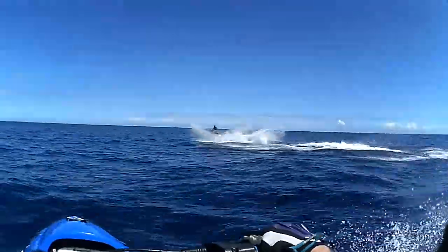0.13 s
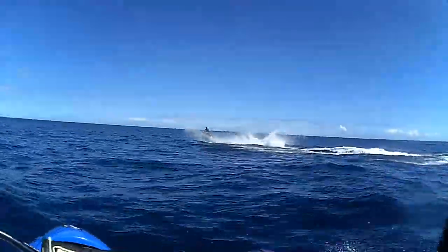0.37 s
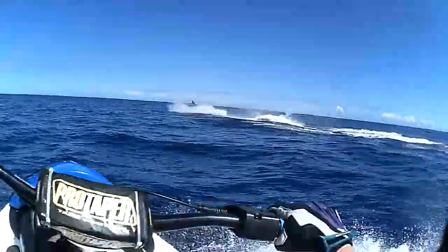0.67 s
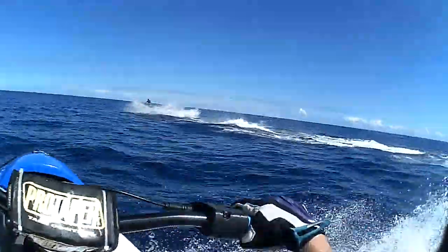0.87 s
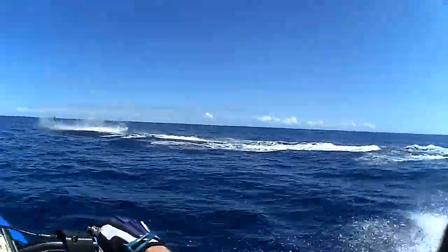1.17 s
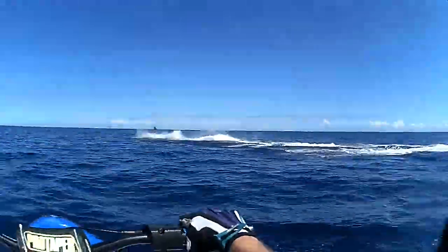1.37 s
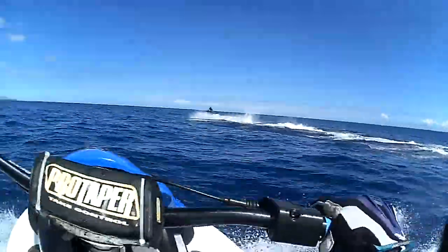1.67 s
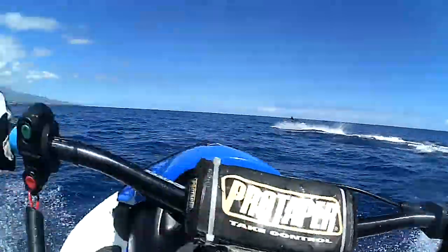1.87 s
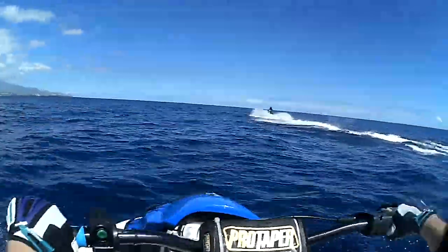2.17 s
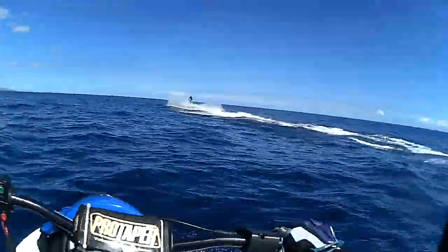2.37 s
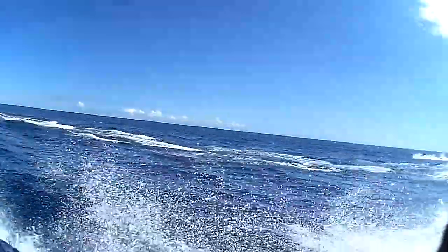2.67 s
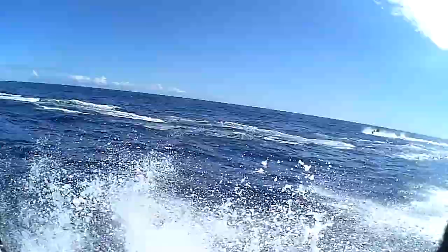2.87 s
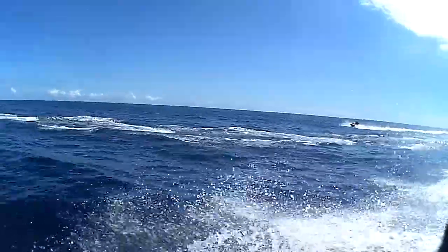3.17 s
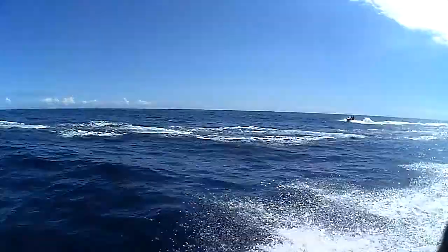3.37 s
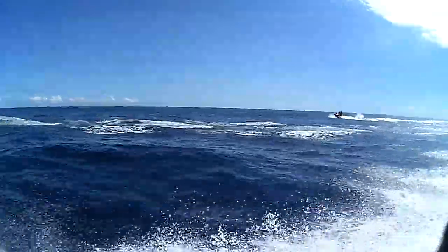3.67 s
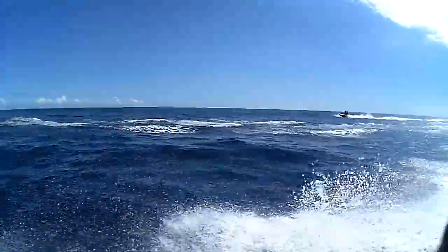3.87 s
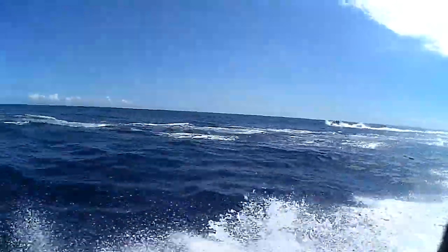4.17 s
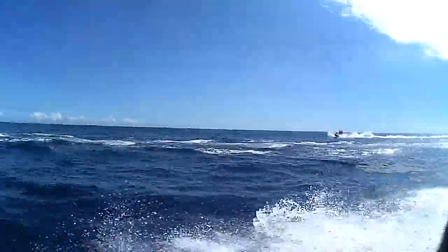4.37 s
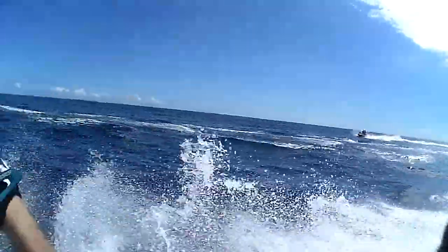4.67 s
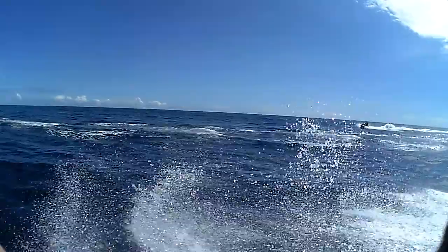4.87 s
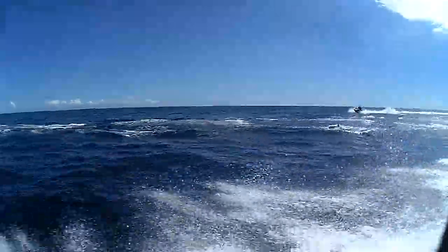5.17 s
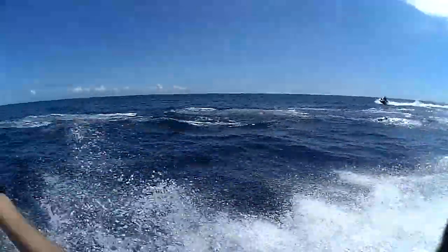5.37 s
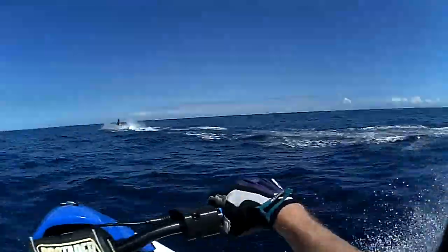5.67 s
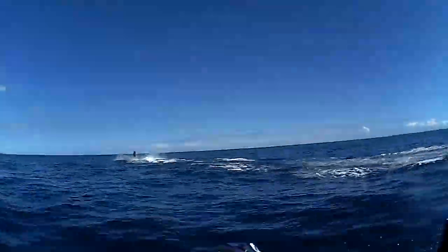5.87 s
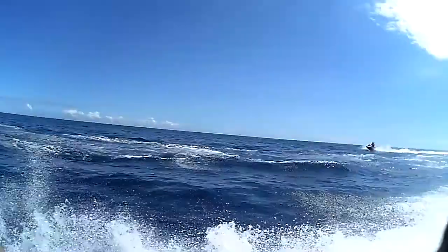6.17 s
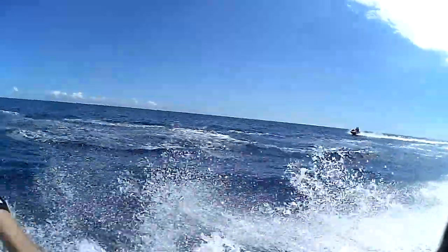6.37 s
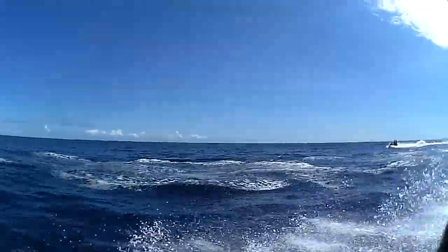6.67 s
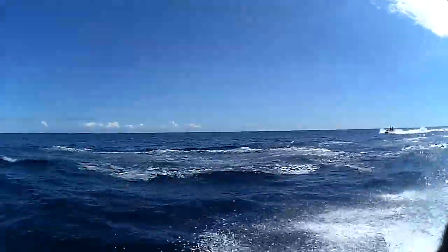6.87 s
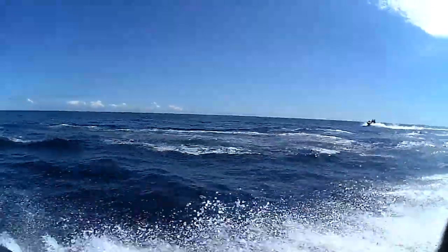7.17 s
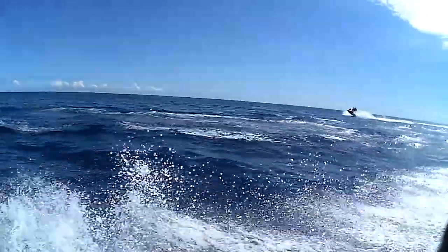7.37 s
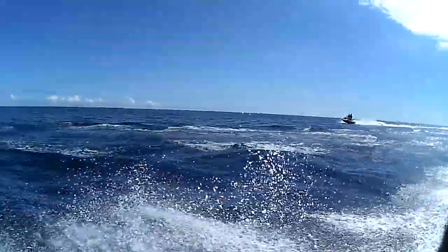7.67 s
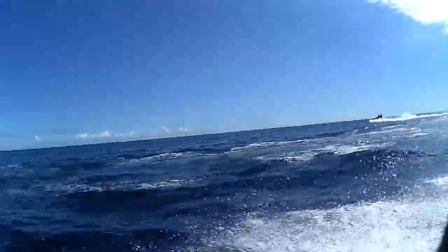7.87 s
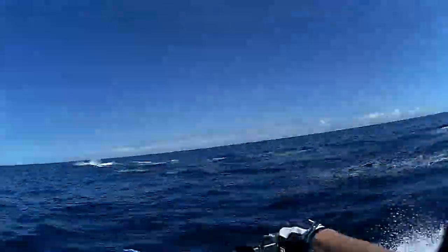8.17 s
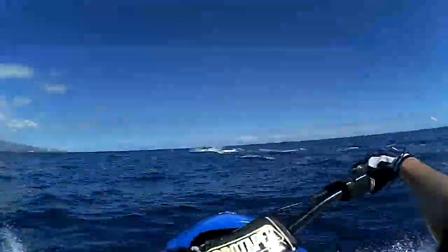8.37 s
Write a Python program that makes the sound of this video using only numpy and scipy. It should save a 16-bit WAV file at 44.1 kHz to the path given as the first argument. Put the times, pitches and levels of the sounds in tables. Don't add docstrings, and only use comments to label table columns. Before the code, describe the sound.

Aboard a jet ski on open sea, heard through a small sealed microphone housing. From 0 to 2.5 seconds a smooth, low two-cylinder engine hum wavers slightly, while strong gusts flutter, rush and whistle hollowly. Dull jolts from waves thump the housing, thickest around 2 seconds, and scattered drops tick on plastic. At about 2.5 the engine jumps higher and becomes quieter and a little rougher; wind and knocks ease, leaving soft spray hiss. Around 4.2 its pitch sags sharply, then climbs back by 4.6. From 5.6 to 6 gusts, slaps and a cluster of drops return as revs settle lower. Deep sea rumble swells near 6.7, then fades; the engine rises again around 7.5. A last gust and jolts arrive after 8.2, with rumble growing to the end at 8.5. Thin microphone hiss persists.

```python
import sys
import numpy as np
from scipy import signal
from scipy.fft import rfft, irfft
from scipy.io import wavfile
from scipy.ndimage import uniform_filter1d

SR = 44100
rng = np.random.default_rng(int(sys.argv[2]) if len(sys.argv) > 2 else 0)


def unload_audio(sound):
    columns = np.transpose(np.atleast_2d(sound))
    steps = np.round(np.clip(columns, -1, 1) * 32767)
    wavfile.write(sys.argv[1], SR, steps.astype(np.int16))


def gain_from_decibels(decibels):
    exponent = np.asarray(decibels, float) / 20
    return 10 ** exponent


N = 375983

# time_s, firing_rate_hz, tone_level_db, cylinder_mismatch_db, second_overtone_db
ENGINE_COURSE = [(0, 129.9, -40.5, -24, -28), (.42, 138, -40.5, -23, -24), (.95, 144.5, -39, -26, -30.5),
                 (1.55, 137.9, -39.3, -25, -26), (2.42, 140.8, -39.5, -20, -28),
                 (2.62, 163.5, -45, -16, -25.5), (3.03, 169.3, -48, -12, -26),
                 (3.7, 162.3, -46.5, -17, -23.5), (3.8, 153.2, -41.5, -21, -26.5),
                 (4.16, 88.4, -44, -29, -24), (4.6, 153.5, -39.5, -27, -26.5),
                 (4.85, 160.7, -41.5, -23, -30), (5.0, 154.5, -44.5, -25, -23),
                 (5.49, 153.5, -41.5, -25.5, -28), (5.72, 136.2, -38.5, -28, -23),
                 (7.17, 133.3, -41, -27.5, -25), (7.58, 159.6, -46.5, -18.5, -24.5),
                 (8.53, 157, -40.5, -18, -22)]
# middle_s, length_s, tone_change_db, speed_change_hz
ENGINE_WAVES = [(.24, .26, -3.5, -2), (.65, .2, -1, -1.5), (1.31, 0.24, -2.5, 1.5), (1.58, 0.078, 0, -3),
                (2.04, 0.068, -2, -1), (2.215, 0.18, -9, -6), (2.37, .06, -4, -1), (2.8, 0.074, -1.5, -1.5),
                (3.22, 0.19, 1, -1.5), (3.42, .16, -1.5, -2.5), (3.99, .16, -3, -3),
                (4.34, .28, -3.5, -1.5), (5.08, 0.11, -3.5, -1), (5.39, 0.25, -3.5, 0),
                (5.62, 0.11, 1.5, -2), (6.05, 0.77, -3.5, -0.2), (6.5, .15, -0.8, 1.5),
                (6.72, 0.23, -4, -0.66), (7.0, 0.21, -2, 0), (7.31, 0.17, 3, -0.7), (7.45, .15, 2, -1),
                (7.85, 0.078, -6.5, -1.5), (8.08, 0.16, 3, 2), (8.28, .16, -1, 1.5)]

# time_s, rumble_level_db
SEA_CHOP = [(0, -54), (.5, -49), (.88, -48.5), (1.26, -51), (1.8, -46.5), (2.3, -51), (2.7, -57),
            (4.3, -61), (4.9, -58), (5.15, -52), (5.45, -62), (5.9, -48), (6.1, -65.5), (6.7, -43),
            (7.2, -66.5), (7.9, -59.5), (8.1, -54), (8.53, -45)]
# middle_s, length_s, buffet_db, whistle_db
WIND_GUSTS = [(0, .05, 6, 13), (.13, 0.073, 8.5, 5.5), (.22, 0.073, -0.5, 7), (.33, 0.042, 10, 11.5),
              (.71, 0.22, 10.5, 3), (.875, .14, 5.5, 11.5), (1.0, .04, 10, 9), (1.31, .03, 1.5, 9),
              (1.42, 0.13, 4.5, 9.5), (1.55, 0.12, 10.5, 9), (1.69, 0.14, 10, 5), (2.03, 0.17, 10, -4),
              (2.21, 0.15, 14, 1), (2.38, 0.17, 9.5, 4), (2.475, 0.076, 2, 6), (3.25, 0.055, 4, 1.5),
              (4.27, 0.082, -5, 3), (4.65, .06, 6, -3), (5.0, 0.14, 3.5, -1), (5.53, .07, 7, 9),
              (5.69, 0.18, 9, 8), (5.83, 0.18, 10.5, 11.5), (5.95, 0.1, 0, 2.5), (6.17, .06, -1, 4),
              (6.78, 0.064, 2, 0), (8.225, 0.16, 10, 10.5), (8.32, .05, 9, 0), (8.52, .12, 5, 3)]
# pitch_hz, level_db (per Hz)
RUMBLE_COLOUR = [(3, -14), (8, -16.5), (18, 6.5), (35, -0.5), (60, -9), (100, -33)]
# pitch_hz, level_db (per Hz)
FLUTTER_COLOUR = [(25, -26), (50, 3.5), (110, 8.5), (215, 1.5), (300, -7), (450, -27)]
# pitch_hz, level_db (per Hz)
RUSH_COLOUR = [(180, -4.5), (300, 3.5), (500, 1.5), (750, -7.5), (1100, -22.5), (1600, -17)]
# pitch_hz, width_hz, level_db
AIR_POCKET = [
    (1877, 400, 1.5),
    (1430, 470, -1.3),
    (2360, 760, -8),
]

# peak_time_s, peak_level_db, rise_ms, recovery_ms
PUSH_JOLTS = [(.755, -40, 8.3, 4), (1.008, -40, 4, 3.3), (1.670, -41.5, 5, 2.8), (1.719, -36, 3.2, 2),
              (2.011, -38, 2.44, 3.5), (2.535, -43, 13, 18.6), (5.090, -40, 9.6, 11.5),
              (5.722, -34, 4.3, 6), (5.864, -38, 3.1, 10.2), (5.927, -33, 6.4, 6.8), (8.413, -34, 7.2, 8),
              (8.487, -31.5, 3.7, 4)]
# peak_time_s, peak_level_db, fall_ms, recovery_ms
SLAP_JOLTS = [(.123, -32, 6.8, 11), (.218, -36.5, 8.3, 8.8), (.323, -27, 8.1, 8.3), (1.018, -39, 3.5, 3.95),
              (1.406, -31.5, 1.6, 3.1), (1.416, -27, 2.2, 5.5), (1.576, -40, 1.85, 2.1),
              (1.676, -36, 2.7, 5), (1.909, -35, 3.2, 2.3), (1.944, -35, 5, 6.6), (1.986, -33, 5.2, 3.4),
              (2.063, -35, 2.5, 1.4), (2.074, -30.5, 2.4, 1.8), (2.168, -35, 3.7, 2.5),
              (2.180, -32, 3.2, 3.1), (2.218, -36, 1.33, 9), (2.266, -38, 4.4, 7.2), (2.311, -30, 5.1, 6.1),
              (2.333, -33, 4.8, 1.9), (2.412, -37, 9.2, 7), (5.639, -39, 2.8, 1.6), (5.832, -43, 1.76, 2.1),
              (6.118, -39, 41, 31), (6.630, -37, 6.5, 7), (6.711, -35.5, 1.8, 13.2), (6.832, -35, 6.4, 9.2),
              (7.890, -39, 5.8, 8), (8.261, -39, 5.5, 6), (8.320, -34, 5.6, 4.7)]
# start_s, peak_level_db
WATER_DROPS = [(.3287, -43), (.4135, -41), (.577, -53), (.8225, -44), (.8684, -54), (1.0026, -51),
               (1.1403, -40), (1.4132, -34), (1.5743, -37), (1.641, -39), (2.4835, -40), (5.6384, -36),
               (5.7059, -51), (5.7294, -52), (5.7566, -50), (5.7993, -48), (5.8252, -33)]

# middle_s, length_s, coarse_mist_db, fine_mist_db
SPRAY_SHEETS = [(.33, 0.54, 4.5, 5), (1.38, 0.67, 4, 4), (2.2, 0.37, 3.5, 2.5), (2.9, 0.98, 3.5, 3),
                (3.75, .45, 3.5, 2.5), (4.25, 0.6, 4.5, 2.5), (5.02, 0.41, 5.5, 4), (6.02, .5, 5.5, 4.5),
                (6.72, .35, 5, 4), (7.13, 0.27, 5, 2), (7.53, .4, 6, 2), (7.85, .3, 3, 2.5),
                (8.4, .4, 3.5, 3.5)]
# pitch_hz, level_db (per Hz)
COARSE_COLOUR = [(4500, -10), (6000, -4), (6900, -1), (7600, -2.5), (8450, -0.5), (9100, -4.5),
                 (9800, -11.5)]
# pitch_hz, level_db (per Hz)
FINE_COLOUR = [(8800, -9), (9500, -4), (10500, -2), (11200, -3.5), (12500, -15)]
# pitch_hz, level_db (per Hz)
HISS_COLOUR = [(20, 1), (100, 1), (230, 6.5), (750, 6.5), (1200, 5.5), (1800, 3.5), (2400, 2.5), (4200, 0),
               (11000, -6.5), (12500, -1.5), (14600, -3), (15200, -2), (15740, -19)]


def curves(table):
    time_s, *columns = np.transpose(table)
    return [np.interp(np.arange(N) / SR, time_s, column) for column in columns]


def swells(table, edge=2.5):
    middle_s, length_s, *columns = np.transpose(table)[:, :, None]
    coarse_steps = np.arange(0, N, 32)
    distance = np.abs(2 * (coarse_steps / SR - middle_s) / length_s)
    hump = np.exp(-distance ** edge)
    return [np.interp(np.arange(N), coarse_steps, (column * hump).sum(0)) for column in columns]


def unit(x):
    return x / np.sqrt(np.mean(x ** 2))


def coloured(x, colour):
    pitch_hz, level_db = np.transpose(colour)
    log_hz = np.log(np.arange(N // 2 + 1) * SR / N + 1e-3)
    gain_db = np.interp(log_hz, np.log(pitch_hz), level_db, left=-90, right=-90)
    return unit(irfft(rfft(x) * gain_from_decibels(gain_db), N))


def walk(rate_hz):
    hold = int(SR / rate_hz)
    held = np.repeat(rng.standard_normal(N // hold + 1), hold)
    smooth = uniform_filter1d(uniform_filter1d(held, hold), hold)
    return unit(smooth[:N])


def engine():
    inertia = int(0.07 * SR)
    course = [uniform_filter1d(column, inertia) for column in curves(ENGINE_COURSE)]
    firing_hz, tone_db, uneven_db, second_db = course
    change_db, change_hz = swells(ENGINE_WAVES, edge=2.1)
    firing_hz = firing_hz + change_hz
    tone_db = tone_db + change_db
    uneven_db = uneven_db - 0.7 * change_db
    second_db = second_db - 0.69 * change_db

    turn = np.pi * np.cumsum(firing_hz * (1 + 0.0027 * walk(26))) / SR
    firing = gain_from_decibels(0.72 * walk(11)) * np.sin(2 * turn)
    half = gain_from_decibels(uneven_db + 1.85 * walk(15)) * np.sin(turn + 0.53 * walk(12))
    between = gain_from_decibels(-35.0 + 1.0 * walk(11)) * np.sin(3 * turn + 0.5 * walk(8.4))
    second = gain_from_decibels(second_db + 1.5 * walk(22)) * np.sin(4 * turn + 0.29 * walk(12))
    third = gain_from_decibels(-42.5 + 2.6 * walk(14)) * np.sin(6 * turn + 0.5 * walk(12))
    return np.sqrt(2) * gain_from_decibels(tone_db) * (firing + half + between + second + third)


def wind():
    rumble_db, = curves(SEA_CHOP)
    buffet_db, whistle_db = swells(WIND_GUSTS)
    calm_db = 0.13 * (rumble_db - np.mean(rumble_db))
    flutter_db = -60 + calm_db + buffet_db + 1.9 * walk(14)
    rush_db = -71 + calm_db + 0.35 * buffet_db + 0.65 * whistle_db + 0.9 * walk(15)
    ring_db = -74.5 + calm_db + whistle_db + 1.24 * walk(16)

    rumble = gain_from_decibels(rumble_db + 3.0) * coloured(eddies(rate_hz=12, patchy_db=2.0), RUMBLE_COLOUR)
    gusts = eddies(rate_hz=50, patchy_db=0.5)
    flutter = gain_from_decibels(flutter_db) * coloured(gusts, FLUTTER_COLOUR)
    rush = gain_from_decibels(rush_db) * coloured(gusts, RUSH_COLOUR)
    fine = pocket(eddies(rate_hz=170, patchy_db=0.5))
    ring = gain_from_decibels(ring_db) * unit(pocket(fine) + 0.26 * fine)
    return rumble + flutter + rush + ring


def eddies(rate_hz, patchy_db):
    return rng.standard_normal(N) * gain_from_decibels(patchy_db * walk(rate_hz))


def pocket(x):
    rings = []
    for pitch_hz, width_hz, level_db in AIR_POCKET:
        b, a = signal.iirpeak(pitch_hz, pitch_hz / width_hz, SR)
        rings.append(gain_from_decibels(level_db) * signal.lfilter(b, a, x))
    main, *sides = rings
    return main - sum(sides)


def jolts(table):
    out = np.zeros(N)
    around = np.arange(-5000, 9000)
    t_ms = around / SR * 1000
    for peak_s, level_db, before_ms, after_ms in table:
        swing = np.exp(-(t_ms / np.where(t_ms < 0, before_ms, after_ms)) ** 2)
        rebound = before_ms / (before_ms + 3)
        back = rebound * np.exp(-((t_ms / after_ms - 2.6) / 0.67) ** 2)
        at = int(peak_s * SR) + around
        inside = at < N
        out[at[inside]] += gain_from_decibels(level_db) * (swing - back)[inside]
    return out


def drops():
    start_s, level_db = np.transpose(WATER_DROPS)
    hits = np.zeros(N)
    hits[(start_s * SR).astype(int)] = gain_from_decibels(level_db + 18) * rng.choice([-1, 1], len(start_s))
    bounced = hits + 0.16 * np.roll(hits, 70)
    return pocket(pocket(bounced))


def spray():
    coarse_db, fine_db = swells(SPRAY_SHEETS, edge=1.7)
    patches = gain_from_decibels(0.56 * walk(16))
    coarse = gain_from_decibels(-75.5 + coarse_db) * coloured(rng.standard_normal(N), COARSE_COLOUR)
    fine = gain_from_decibels(-77 + fine_db) * coloured(rng.standard_normal(N), FINE_COLOUR)
    return patches * (coarse + fine)


def microphone_noise():
    hiss = gain_from_decibels(-64) * coloured(rng.standard_normal(N), HISS_COLOUR)
    whine = gain_from_decibels(-91.5) * np.sin(2 * np.pi * 12441 * np.arange(N) / SR)
    offset = 0.0028
    return hiss + whine + offset


def scene():
    membrane_jolts = jolts(PUSH_JOLTS) - jolts(SLAP_JOLTS)
    mix = engine() + wind() + membrane_jolts + drops() + spray()
    return mix[None]


def low_pass(x):
    return signal.sosfilt(signal.butter(12, 15910, fs=SR, output="sos"), x)


def record(dry):
    mix = dry + microphone_noise()
    return low_pass(mix)


dry = scene()
out = record(dry)
unload_audio(out)
```